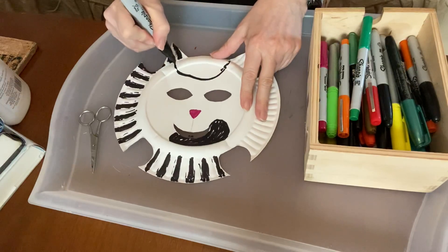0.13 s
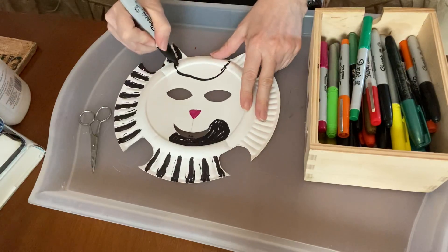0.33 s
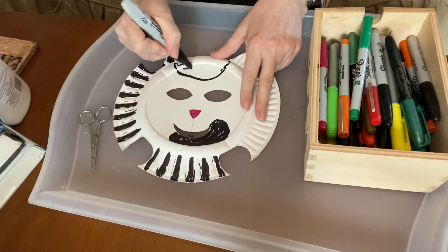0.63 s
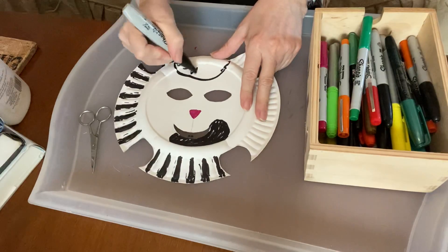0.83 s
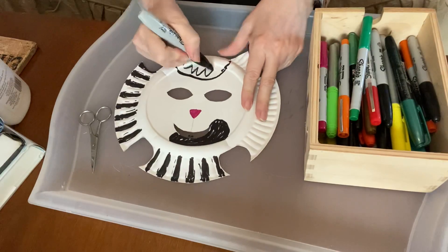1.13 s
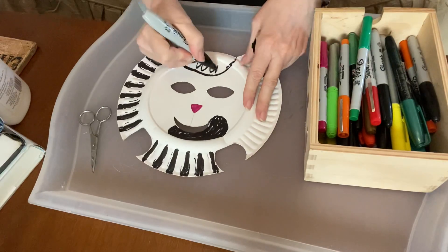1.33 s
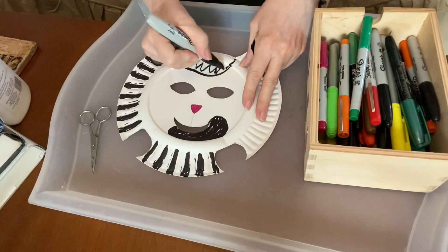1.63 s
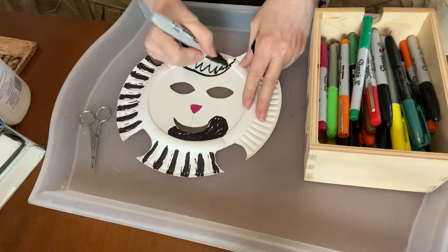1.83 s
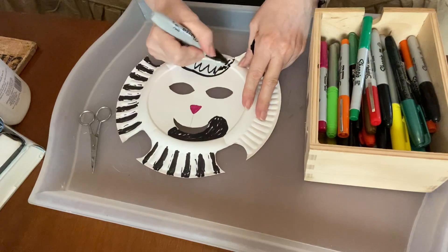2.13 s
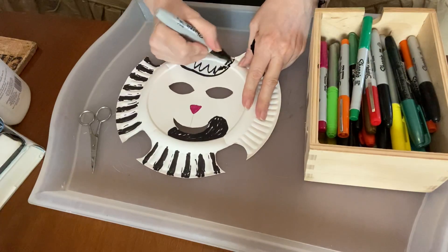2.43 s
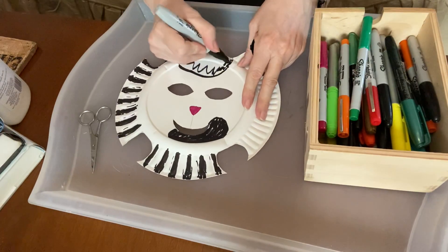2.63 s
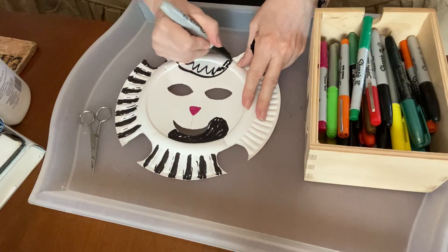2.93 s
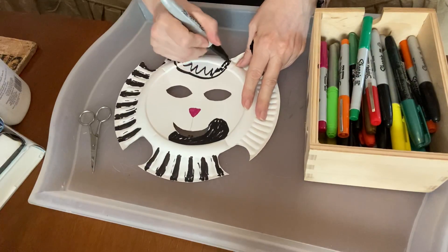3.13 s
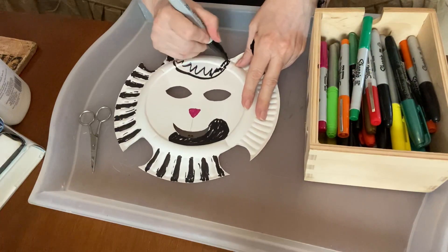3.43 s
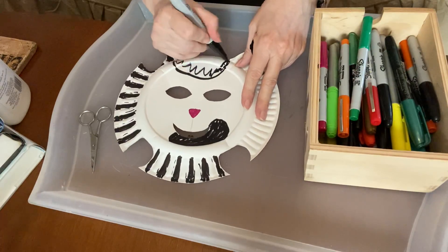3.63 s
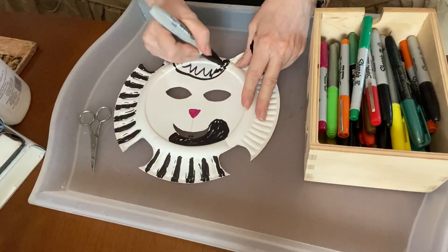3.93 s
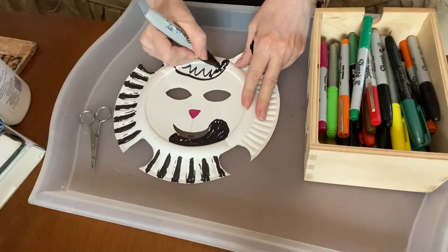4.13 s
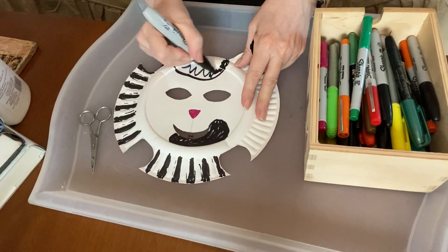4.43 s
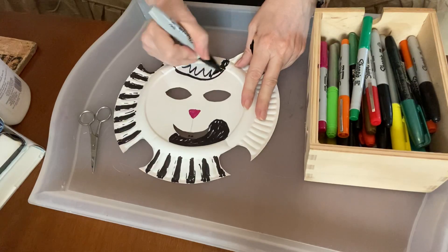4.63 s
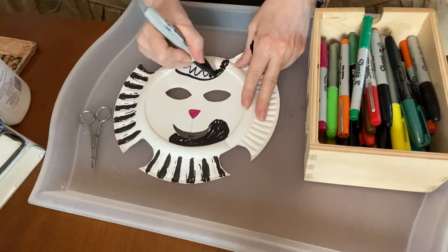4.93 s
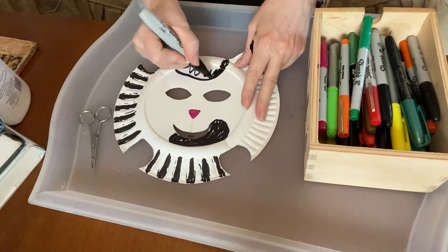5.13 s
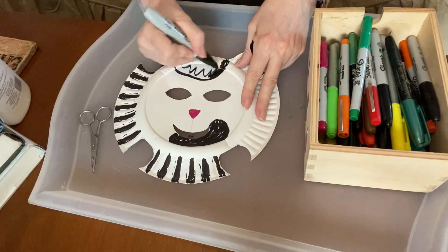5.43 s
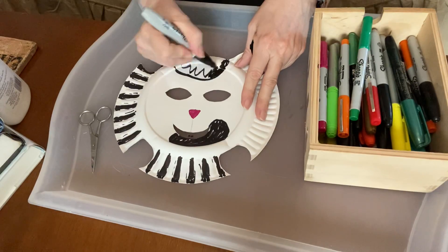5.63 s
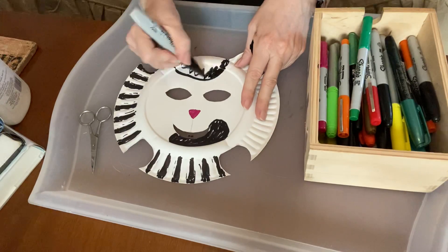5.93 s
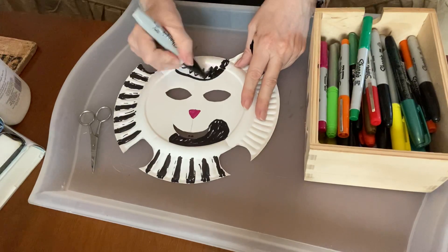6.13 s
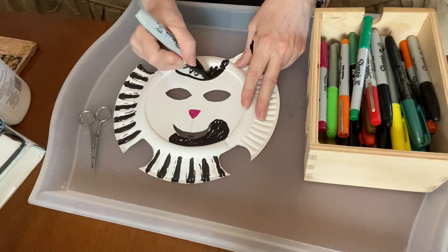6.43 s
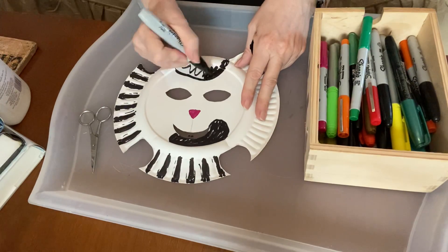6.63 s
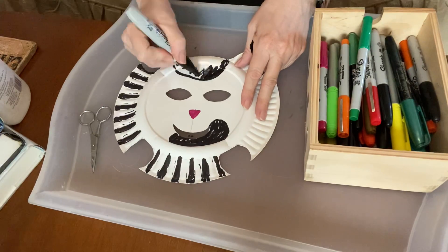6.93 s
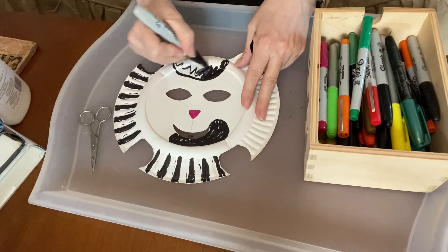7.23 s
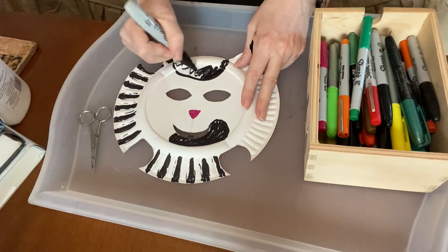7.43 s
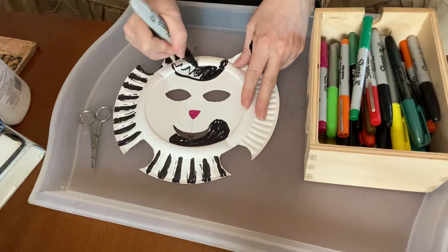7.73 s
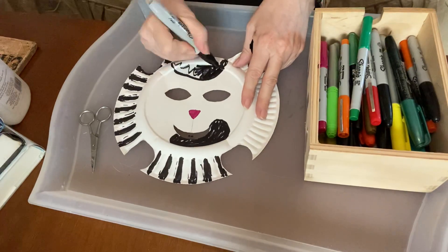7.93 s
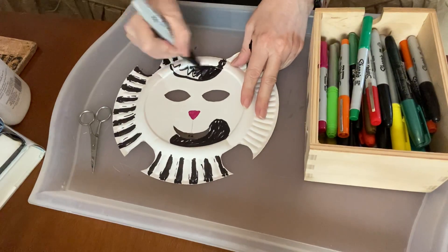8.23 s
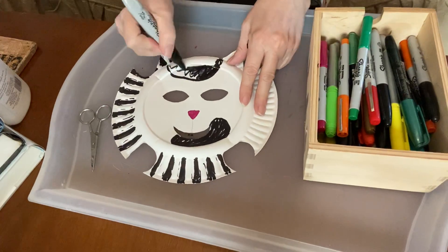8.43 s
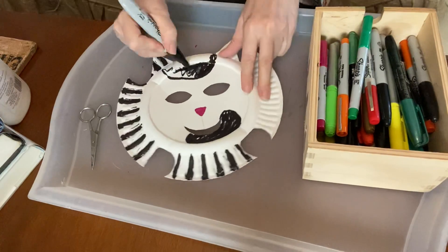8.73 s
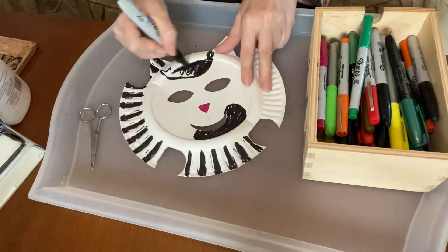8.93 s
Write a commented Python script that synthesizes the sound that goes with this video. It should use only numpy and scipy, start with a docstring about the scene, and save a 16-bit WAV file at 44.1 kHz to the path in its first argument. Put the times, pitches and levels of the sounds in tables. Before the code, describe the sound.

Quick, dry marker strokes rub over a paper plate in a small room, with a hollow ring and occasional nib taps.

```python
"""A felt-tip marker scribbles back and forth on a paper plate in a plastic tray, in a small room.
Each sweep speeds up and brakes. Sliding friction over the fibres makes hiss and crackle, and drives
hollow resonances of plate and pen that vary from spot to spot. At times the nib taps, digs in, rasps or
sings, and once it squeaks. Impacts of the plate on the tray excite bending waves and low modes, the hands
rumble on the tray, and at the end the plate is slid round."""
import sys
import numpy as np
from scipy import signal
from scipy.fft import rfft, irfft, next_fast_len
from scipy.io import wavfile
from scipy.ndimage import map_coordinates

SR = 44100
rng = np.random.default_rng(int(sys.argv[2]) if len(sys.argv) > 2 else 0)


def wrap_up_sound(samples):
    """Save the sound to the file named by the first command line argument, as 16-bit audio."""
    columns = np.atleast_2d(samples).T
    # keep every value between -1 and 1, then stretch to whole-number steps
    tamed = np.clip(columns, -1, 1)
    steps = np.round(tamed * 32767).astype(np.int16)
    wavfile.write(sys.argv[1], SR, steps)


N = 399987

# friction spectrum of felt on paper: (frequency [Hz], relative density [dB])
FELT_SPECTRUM = [(850, -28), (1350, -11), (2150, -13.5), (2850, -2.5), (4100, -2.5), (4900, -6),
                 (6500, -5.5), (7700, 0.5), (10700, -7.5), (11800, -9), (13300, -12), (15500, -17.5)]
USUAL_DB = -43.5  # level of a typical sweep


def scribble():
    """Reciprocating friction: the nib sweeps to and fro about five times a second."""
    # (start [s], end [s], level [dB])
    sweeps = [(0.098, 0.205, -46.5), (0.148, 0.225, -37), (0.281, 0.453, -38), (0.452, 0.558, -32.5),
              (0.537, 0.632, -37), (0.621, 0.726, -39.5), (0.715, 0.812, -39.5), (0.807, 0.898, -40.5),
              (0.888, 0.983, -38), (0.984, 1.08, -41.5), (1.062, 1.17, -41.5), (1.165, 1.255, -41),
              (1.252, 1.339, -33.5), (1.344, 1.423, -43.5), (1.428, 1.542, -42), (1.529, 1.616, -48),
              (1.626, 1.747, -50), (1.757, 1.871, -44), (1.868, 1.975, -45.5), (1.981, 2.106, -42),
              (2.097, 2.203, -40.5), (2.207, 2.312, -42.5), (2.312, 2.404, -43), (2.383, 2.523, -44),
              (2.499, 2.611, -38.5), (2.631, 2.819, -54.5), (2.815, 2.953, -46), (2.941, 3.049, -41.5),
              (3.046, 3.131, -54), (3.139, 3.26, -55.5), (3.29, 3.418, -46.5), (3.412, 3.479, -51),
              (3.491, 3.578, -46), (3.593, 3.797, -46.5), (3.803, 3.867, -50), (3.847, 3.997, -44.5),
              (3.97, 4.06, -46), (4.053, 4.164, -42), (4.156, 4.246, -41), (4.252, 4.321, -45),
              (4.345, 4.495, -42), (4.517, 4.615, -38.5), (4.613, 4.724, -42), (4.753, 4.842, -39.5),
              (4.846, 4.944, -43.5), (4.966, 5.052, -38.5), (5.05, 5.162, -42), (5.179, 5.264, -38),
              (5.265, 5.379, -42.0), (5.385, 5.471, -38.5), (5.461, 5.579, -39), (5.586, 5.676, -37.5),
              (5.669, 5.783, -37.5), (5.791, 5.877, -36), (5.866, 5.985, -41), (5.989, 6.08, -37.0),
              (6.075, 6.178, -38), (6.176, 6.286, -42), (6.295, 6.383, -45.5), (6.438, 6.531, -55.5),
              (6.559, 6.644, -44.5), (6.649, 6.752, -43.5), (6.752, 6.856, -37.5), (6.838, 6.955, -39.0),
              (6.958, 7.05, -37.5), (7.04, 7.162, -41), (7.175, 7.296, -39), (7.288, 7.424, -40),
              (7.447, 7.579, -37.5), (7.598, 7.737, -37), (7.764, 7.911, -36.5), (7.973, 8.179, -36.5),
              (8.199, 8.306, -38), (8.293, 8.43, -36), (8.453, 8.533, -36.5), (8.522, 8.676, -36.5),
              (8.649, 8.782, -34), (8.756, 8.887, -37), (8.876, 8.976, -35.5), (8.973, 9.091, -38)]
    sound = np.zeros((2, N))
    last_end = 0
    for start, end, level_db in sweeps:
        add(sound, start, sweep(start, end, level_db, pause=start - last_end))
        last_end = end
    return sound


def sweep(start, end, level_db, pause, lean_db=1.5, lift_s=0.019, overlap_s=0.0085):
    """Sliding friction: pressure scales both the hiss of one sweep and the ring that it drives."""
    t = times(end - start)
    middle = (start + end) / 2
    landed = np.clip((pause + overlap_s) / (lift_s + overlap_s), 0, 1)  # 0 turns on the paper, 1 lands
    speed = nib_speed(t, end - start, landed)
    pressure = amp(level_db + lean_db * (t / t[-1] - .5) + 1.3 * wander(t, step=.011))
    return pressure * (hiss(t, middle, level_db, speed) + ring(t, middle, level_db, speed, landed))


def nib_speed(t, length, landed, rise_share=0.213):
    """Acceleration, then braking, as a speed from 0 to 1; long sweeps brake for longer."""
    initial = 0.26 * landed  # a landing nib is already moving
    speeding = initial + (1 - initial) * np.sin(np.pi / 2 * np.clip(t / (rise_share * length), 0, 1))
    brake_s = 0.052 * (length / .1) ** 0.29
    braking = np.sin(np.pi / 2 * np.clip((t[-1] - t) / brake_s, 0, 1)) ** 2
    return speeding * braking * np.clip(t / 0.003, 0, 1)


def hiss(t, when, level_db, speed):
    """Friction noise grows in proportion to speed; firm sweeps bite harder in the low treble."""
    # brightness drifts with the angle of the nib: (time [s], treble emphasis [dB])
    brightness = [(.15, -13), (.55, -6), (1.05, -4.5), (1.29, -6.5), (1.68, -6.5), (2.03, -1), (2.6, -5.5),
                  (2.87, -5.5), (3.45, -7), (4.15, -4.5), (5.6, -1), (6.4, -5), (6.8, -3.5), (7.6, -5.5),
                  (9, -0.5)]
    bright_db = np.interp(when, *np.transpose(brightness))
    spectrum = felt(bite_db=0.6 * (level_db - USUAL_DB), centre_hz=5000, octaves=0.51)
    rub = friction(t, spectrum, bright_db)
    crackle = amp(bright_db / 2) * snapping_fibres(len(t))
    return amp(-1.5) * speed * (rub + crackle + singing(t, when, speed))


def felt(bite_db, centre_hz, octaves):
    """Contact pressure reshapes the friction spectrum, raising or lowering one broad band."""
    return [(hz, db + bite_db * np.exp(-(np.log2(hz / centre_hz) / octaves) ** 2))
            for hz, db in FELT_SPECTRUM]


def friction(t, spectrum, bright_db=0, spot_s=.055, broad_db=3.0, fine_db=3.5):
    """A moving point of excitation: each spot of the plate favours its own bands and narrow modes."""
    size = next_fast_len(len(t))
    hz = bins(size)
    shift = 1 + .1 * (rng.random() - .5)  # resonances move a little with grip and place
    tilt_db = 0.75 * bright_db * np.clip(np.log2((hz + 1) / 5500), -1, .6)
    base_db = read(spectrum, hz * shift) + tilt_db
    spread_db = broad_db * np.clip(hz / 5000, 1, 1.5)  # spots differ most in the treble
    moves = max(round(t[-1] / spot_s), 1)
    position = moves * t / t[-1]
    sound = np.zeros((2, len(t)))
    for spot in range(moves + 1):
        excitation = slips(size)
        spot_db = base_db + spread_db * wander(hz, step=536.2) + fine_db * wander(hz, step=55)
        crossfade = np.cos(np.pi / 2 * np.clip(position - spot, -1, 1))
        sound += crossfade * coloured(excitation, spot_db)[:, :len(t)]
    return sound


def slips(size, snags_per_s=1800, snag_size=1.0):
    """Countless tiny slips superpose to Gaussian noise, with larger snags as impulses among them."""
    snags = (rng.random(size) < snags_per_s / SR) * snag_size * (1 + rng.random(size))
    return rng.standard_normal((2, size)) + 2 * snags * rng.choice([-1, 1], (2, size))


def snapping_fibres(size, level_db=-11):
    """Fracture of single paper fibres gives sparse, crisp clicks in the top treble."""
    # (frequency [Hz], relative density [dB])
    snap_spectrum = [(3000, -21), (9000, 1.5), (13500, 1), (15500, -27)]
    snaps = slips(size, snags_per_s=350, snag_size=4.5)
    return amp(level_db + 2 * rng.standard_normal()) * coloured(snaps, read(snap_spectrum, bins(size)))


def singing(t, when, speed, half_width_hz=330, bend=0.1008):
    """A narrow resonance of the nib filters noise into a breathy whistle that rises with speed."""
    # the nib sings at some angles: (time [s], level against the rubbing [dB], frequency [Hz])
    whistle = [(0.9, -14, 5500), (1.9, -6, 4720), (3.8, -13, 4800), (4.5, -16, 5000), (7.1, -15, 5900),
               (7.7, -3, 5650), (8.6, -10, 5440)]
    moments, levels, pitches = np.transpose(whistle)
    level_db, hz = np.interp(when, moments, levels), np.interp(when, moments, pitches)
    band = coloured(rng.standard_normal(len(t)), resonance_db(bins(len(t)) - hz, half_width_hz))
    bend_cycles = np.cumsum(hz * bend * (speed - speed.mean())) / SR
    return amp(level_db) * (signal.hilbert(band) * np.exp(2j * np.pi * bend_cycles)).real


def ring(t, when, level_db, speed, landed, follows=0.91, jolt_s=0.008):
    """Forced vibration: plate and pen ring hollowly, with a strength and pitch set by the nib's place."""
    # strength of the ring as the nib works over the plate: (time [s], level [dB])
    ring_levels = [(.15, -53.5), (.5, -64.5), (.93, -48), (1.5, -55), (1.8, -48), (2.2, -59), (2.55, -53),
                   (3.5, -51), (3.93, -64.5), (4.28, -59), (4.6, -48.5), (5.1, -45), (5.8, -54.5),
                   (6.12, -59), (6.22, -44), (6.55, -34.5), (6.8, -53), (9, -57)]
    # main hollow resonance: (time [s], nominal pitch [Hz])
    ring_pitches = [(1.1, 1540), (1.8, 1350), (4.3, 1530), (5.0, 1540)]
    ring_db = np.interp(when, *np.transpose(ring_levels)) + follows * (level_db - USUAL_DB)
    relative_db = ring_db - level_db
    pitch_hz = np.interp(when, *np.transpose(ring_pitches))
    spectrum = hollow(pitch_hz, body_db=0.1 * min(relative_db, 0))  # a weak ring is also thinner
    jolt = 1 + landed * 0.69 * np.exp(-t / jolt_s)  # a landing jolts the plate
    flutter_db = 1.3 * wander(t, step=0.0168)
    drive = speed ** 0.33  # the ring stands out where the nib is slow
    return amp(relative_db - 3 + flutter_db) * jolt * drive * friction(t, spectrum)


def hollow(pitch_hz, body_db=0, usual_hz=1567, body_hz=1000):
    """The resonances of plate and pen barrel, transposed together; body_db weights the low ones."""
    # (frequency [Hz], relative density [dB])
    resonances = [(230, -13), (380, -14.5), (640, -9.5), (1200, -7), (1650, 1), (1900, 3), (2250, -14),
                  (3300, -11), (6300, -19), (7400, -8), (9000, -24)]
    return [(hz * pitch_hz / usual_hz, db + body_db * (hz < body_hz)) for hz, db in resonances]


def tap(crack_db, tock_db, tock_hz, crack_t60=0.073, tock_t60=0.043):
    """Impact of the nib: a papery crack, and the heavily damped resonance of the spot that it strikes."""
    t = np.arange(2048) / SR
    octaves = np.log2((bins(len(t)) + 1) / tock_hz)
    tock = coloured(rng.standard_normal((2, len(t))), 2 * resonance_db(octaves, half_width=0.99))
    tock *= amp(tock_db - 60 * t / tock_t60)
    crack = friction(t, FELT_SPECTRUM) * amp(crack_db - 60 * t / crack_t60)
    return (crack + tock) * np.clip(t / 0.001, 0, 1)


def dig(length, level_db, centre_hz):
    """Friction rises as the felt digs in: a swell of coarse scratch with one band emphasised."""
    t = times(length)
    spectrum = felt(bite_db=9, centre_hz=centre_hz, octaves=0.27)
    return amp(level_db) * np.sin(np.pi * t / length) * friction(t, spectrum)


def rasp(length, level_db, pitch_hz):
    """Forced resonance: the nib judders and the hollow ring alone swells for a moment."""
    t = times(length)
    return amp(level_db) * np.sin(np.pi * t / length) * friction(t, hollow(pitch_hz))


def squeak(level_db=-33, pitch_hz=2720, half_width_hz=270):
    """Stick-slip motion of hard-pressed felt gives a brief, rough, narrow-band squeak."""
    t = times(0.05)
    band = coloured(slips(len(t)), resonance_db(bins(len(t)) - pitch_hz, half_width_hz))
    envelope = np.cos(np.pi / 2 * t / t[-1]) * (1 - np.exp(-t / 0.00072))
    return amp(level_db) * band * envelope


def knock(level_db, tilt_db, top_hz=999, end_hz=68.8, glide_s=0.00376, flex_t60=0.18, thud_t60=0.34):
    """Impact of plate on tray: a dispersive bending wave, modes that swell and linger, and a dull thud."""
    # modes of the plate on the tray: (frequency [Hz], relative level [dB], time to full swing [s])
    modes = [(137.2, -13, 0.021), (218.6, -5, 0.015), (1245, 0.5, 0.0025)]
    # (frequency [Hz], relative density [dB])
    thud_spectrum = [(100, -12), (300, 5), (1300, -3), (2200, -38)]
    t = times(1 / 3)
    attack = 1 - np.exp(-t / 0.00063)
    # high frequencies cross the thin plate first, so the knock glides down
    flex_hz = end_hz + (top_hz - end_hz) / (1 + t / glide_s)
    partials = [(flex_hz, -60 * t / flex_t60, attack)]
    partials += [(np.full(len(t), hz), db, t / rise * np.exp(1 - t / rise)) for hz, db, rise in modes]
    pivot_hz = modes[1][0]
    plate = np.zeros(len(t))
    for hz, db, envelope in partials:
        phase = 2 * np.pi * (np.cumsum(hz) / SR + rng.random())
        plate += amp(db + tilt_db * np.log2(hz / pivot_hz)) * envelope * np.sin(phase)
    thud = coloured(slips(len(t)), read(thud_spectrum, bins(len(t))))
    thud *= amp(-10 - 60 * t / thud_t60) * attack
    return amp(level_db - 8) * (plate * np.array([[1], [0.64]]) + thud)


def sliding_plate():
    """Sliding friction of the plate as it is moved round on the tray."""
    # (time [s], level [dB])
    slide_levels = [(8.28, -64), (8.33, -50.5), (8.41, -46.5), (8.44, -65), (8.49, -50.5), (8.71, -43.5),
                    (8.85, -48), (8.95, -54), (9.07, -72)]
    # (frequency [Hz], relative density [dB])
    slide_spectrum = [(50, -23), (200, 3.5), (350, -0.5), (650, 4), (1500, -0.5), (2700, 5), (5000, -9),
                      (15000, -40)]
    return rubbing(slide_levels, slide_spectrum, uneven_db=2.8)


def hands():
    """Structure-borne rumble: the hands lean and shift on the tray."""
    # (time [s], level [dB])
    hand_levels = [(0, -68.5), (.8, -70.5), (1.0, -55), (1.6, -68), (2.05, -52.5), (2.5, -71.5),
                   (4.2, -72.5), (6.5, -66.5), (8.0, -69.5), (8.25, -64)]
    # (frequency [Hz], relative density [dB])
    tray_spectrum = [(20, -18), (60, 0.5), (135, -3.5), (300, -35), (1500, -43)]
    return rubbing(hand_levels, tray_spectrum, uneven_db=3.0)


def rubbing(levels, spectrum, uneven_db):
    """Friction over a broad contact: uneven drag modulates the level of the noise."""
    t = np.arange(N) / SR
    level_db = np.interp(t, *np.transpose(levels), left=-120) + uneven_db * wander(t, step=.025)
    return amp(level_db) * coloured(slips(N), read(spectrum, bins(N)))


def reverberation(x, t60=0.49, wet_db=-16):
    """Reflections from the nearby walls merge into a diffuse tail that decays exponentially."""
    t = times(0.5)
    tail = rng.standard_normal((2, len(t))) * amp(-60 * t / t60) * (t > .004)
    tail /= np.linalg.norm(tail[0])
    return amp(wet_db) * signal.fftconvolve(x, tail, axes=1)[:, :N]


def room_air(level_db=-75.0):
    """Ambient noise: the faint, steady broadband floor of the room."""
    # (frequency [Hz], relative density [dB])
    air_spectrum = [(20, -22), (280, -3.5), (2000, -11.5), (2600, -14.5), (15000, -36)]
    return amp(level_db) * coloured(rng.standard_normal((2, N)), read(air_spectrum, bins(N)))


def amp(db):
    """Decibels to amplitude ratio."""
    return 10 ** (np.asarray(db) / 20)


def times(length):
    """Sample times [s] of a sound of this duration."""
    return np.arange(round(length * SR)) / SR


def bins(size):
    """Fourier frequencies [Hz] of a sound of this many samples."""
    return np.fft.rfftfreq(size, 1 / SR)


def read(points, hz):
    """Interpolates a spectrum on a log-frequency axis."""
    frequencies, values = np.transpose(points)
    return np.interp(np.log(hz + 1), np.log(frequencies), values)


def resonance_db(detuning, half_width):
    """A resonance peak, 6 dB down at half_width from its centre."""
    return -20 * np.log10(1 + (detuning / half_width) ** 2)


def coloured(x, db):
    """Filters x by a gain in dB for each frequency, then scales it to rms 1."""
    shaped = irfft(rfft(x) * amp(db), x.shape[-1])
    return shaped / np.sqrt(np.mean(shaped ** 2) + 1e-20)


def wander(axis, step):
    """Smooth, bounded random variation of spread about 1, with a new value each step along the axis."""
    place = (axis - axis[0]) / step
    knots = np.sqrt(3) * rng.uniform(-1.37, 1, int(place[-1]) + 2)
    return map_coordinates(knots, [place], order=3, mode="nearest")


def add(mix, start, sound):
    """Superposes a two-channel sound on the mix from start [s]."""
    part = mix[:, max(round(start * SR), 0):][:, :sound.shape[1]]
    part += sound[:, :part.shape[1]]


def scene():
    """Superposition of marker, plate, hands and room, as two signals that the stereo widening blends."""
    # (time [s], crack level [dB], tock level [dB], tock frequency [Hz])
    taps = [(0.282, -44, -39, 3000), (0.631, -40, -29.5, 3750), (0.6624, -46, -37, 2680),
            (0.81, -41, -36, 4030), (0.988, -41, -41, 3520), (1.1345, -57, -35, 2520),
            (5.1836, -38.5, -39, 1630), (5.586, -46, -36.5, 1600), (5.793, -40, -36.5, 1680),
            (6.961, -55, -39, 1740), (7.445, -40.5, -37.5, 1240), (7.768, -32.5, -41.5, 1500),
            (8.202, -31, -40, 1720), (8.457, -35, -42, 1640)]
    # (time [s], duration [s], level [dB], band centre [Hz])
    digs = [(0.291, 0.051, -42, 2800), (2.024, 0.03, -39, 12000), (2.88, 0.035, -44.5, 7850),
            (2.98, 0.034, -42, 7500), (7.223, 0.051, -40, 3700), (7.503, 0.054, -33, 4060),
            (7.8, 0.055, -37, 3500), (7.987, 0.037, -38, 3780), (8.253, 0.034, -36.5, 3400)]
    # (time [s], level [dB], hardness as spectral tilt [dB/octave])
    knocks = [(0.526, -47, 2.5), (1.28, -45, 1), (6.972, -27, 0), (7.657, -46, 1.5), (7.768, -40.5, -3.5),
              (8.056, -46, 3)]
    # (time [s], duration [s], level [dB], nominal pitch [Hz])
    rasps = [(0.697, 0.029, -48, 1050), (0.858, 0.053, -40.5, 1590), (0.948, 0.024, -45, 1540),
             (1.015, 0.07, -42.5, 1590), (1.269, 0.056, -41, 1090), (2.511, 0.04, -44.5, 1340),
             (6.169, 0.061, -38.5, 1540), (8.935, 0.035, -45, 1090)]
    direct = scribble()
    for source, events in (tap, taps), (dig, digs), (knock, knocks), (rasp, rasps):
        for start, *settings in events:
            add(direct, start, source(*settings))
    add(direct, 1.268, squeak())
    direct += sliding_plate() + hands()
    air = room_air()
    return direct + reverberation(direct) + air


def record(dry, cutoff_hz=15700):
    """Stereo widening: partly alike channels go in and out of phase with frequency; then a low-pass."""
    # likeness of the channels: (frequency [Hz], coherence [0-1])
    coherence = [(200, 0.71), (750, 0.39), (1500, 0.72), (3600, 0.62), (4600, 0.19), (6000, 0.05)]
    # (frequency [Hz], phase lead of left over right [rad])
    phase_lead = [(100, 0), (2500, -.5), (4100, -1.2), (4600, -3), (5900, -2.8), (7400, -.2), (8600, .2),
                  (9900, 3), (11200, 3.3), (12300, 6.2), (13800, 6.4), (14900, 9.42)]
    # (frequency [Hz], level of left over right [dB])
    balance = [(250, .5), (700, -4), (1800, .5), (3000, -1), (6800, -2), (7800, 0)]
    size = next_fast_len(N + SR)
    hz = bins(size)
    shared, other = rfft(dry, size)
    lead = read(phase_lead, hz)
    apart = np.sqrt(1 - np.clip(read(coherence, hz), 0, 1) ** 2)
    treble = np.clip((hz - 6700) / 900, 0, 1)
    apart *= 1 - treble * (1 - abs(np.sin(lead)))  # the treble is alike where in phase or opposed
    right = (np.sqrt(1 - apart ** 2) * shared + apart * other) * np.exp(-1j * lead)
    left_gain = amp(read(balance, hz) / 2)
    pair = irfft(np.array([shared * left_gain, right / left_gain]), size)[:, :N]
    low_pass = signal.firwin(511, cutoff_hz, window=("kaiser", 9), fs=SR)
    return signal.oaconvolve(pair, low_pass[None], "same", axes=1)


dry = scene()
out = record(dry)
wrap_up_sound(out)
```